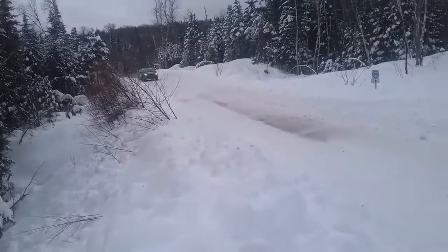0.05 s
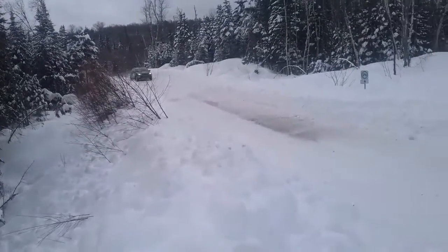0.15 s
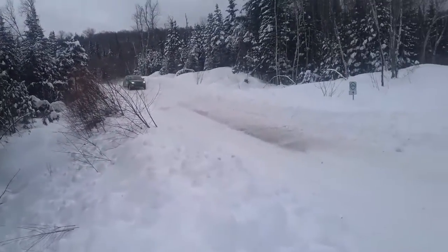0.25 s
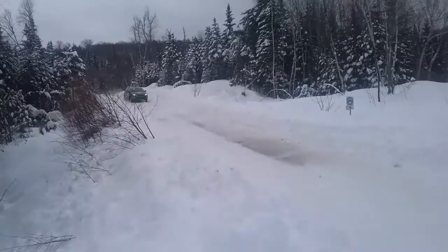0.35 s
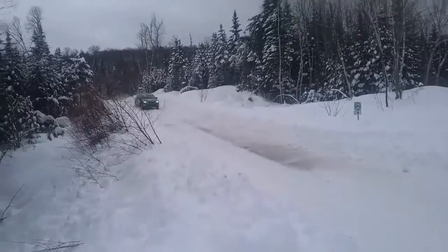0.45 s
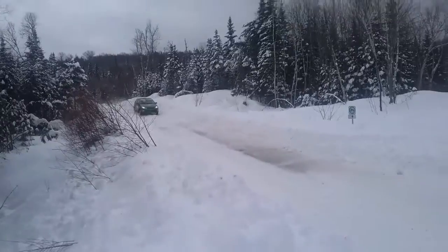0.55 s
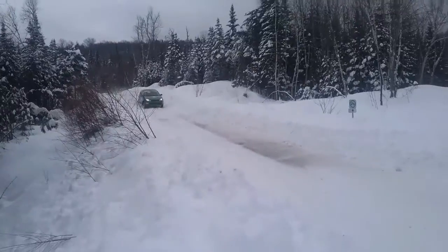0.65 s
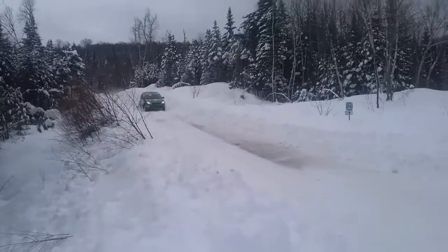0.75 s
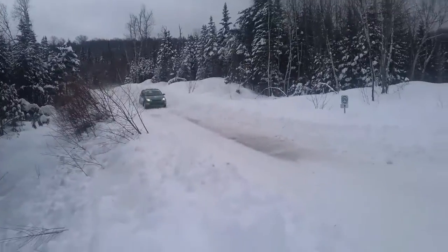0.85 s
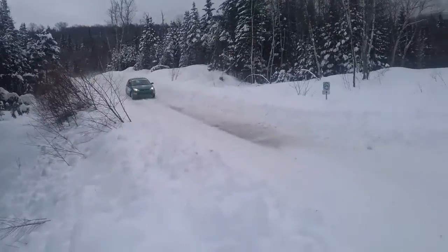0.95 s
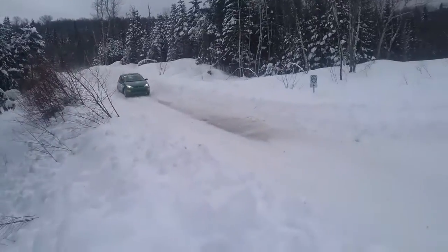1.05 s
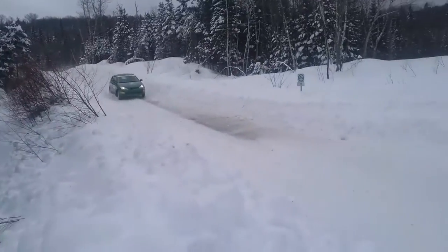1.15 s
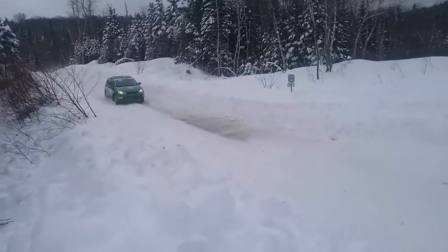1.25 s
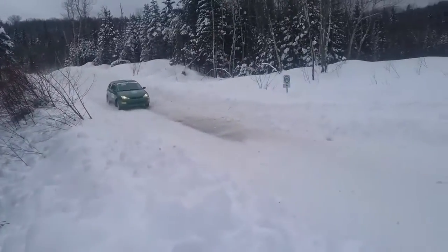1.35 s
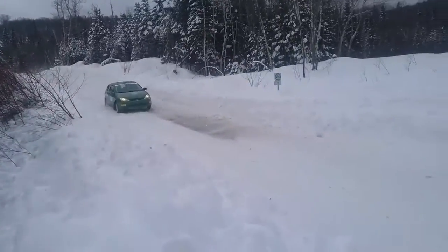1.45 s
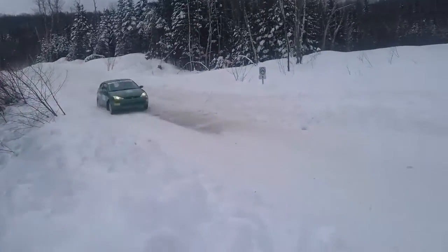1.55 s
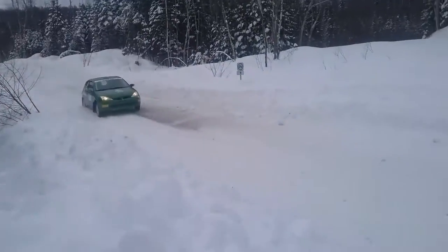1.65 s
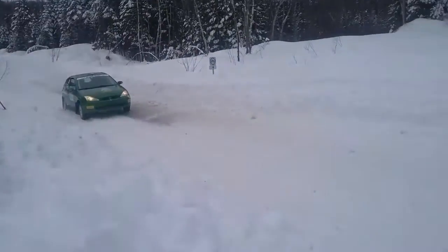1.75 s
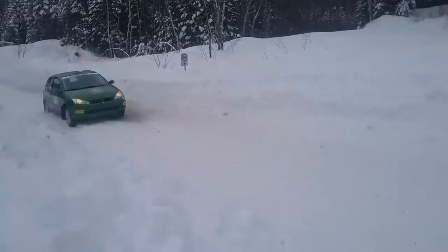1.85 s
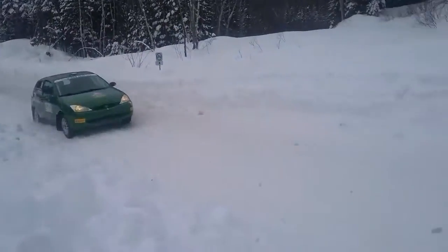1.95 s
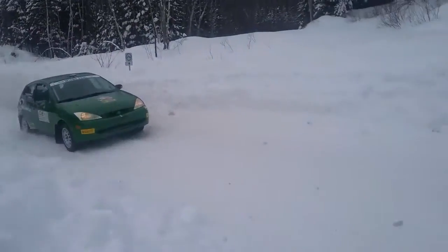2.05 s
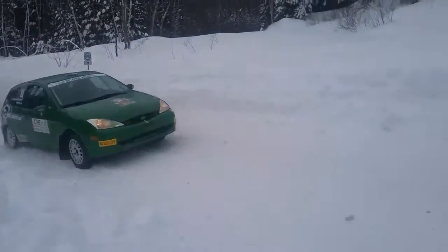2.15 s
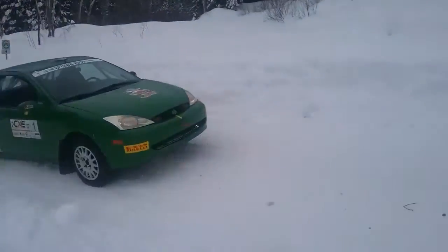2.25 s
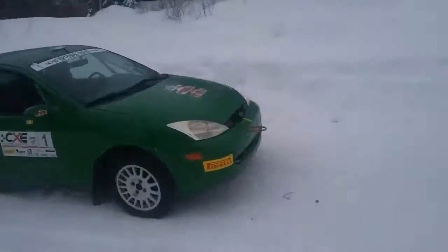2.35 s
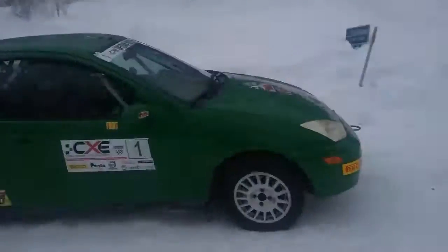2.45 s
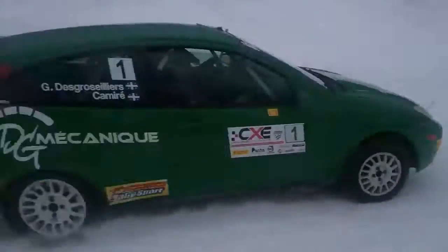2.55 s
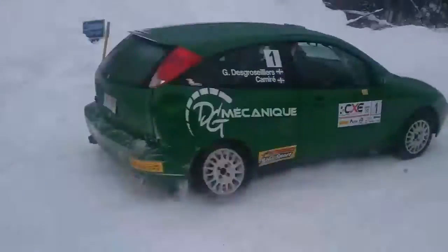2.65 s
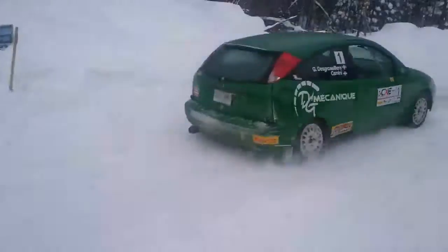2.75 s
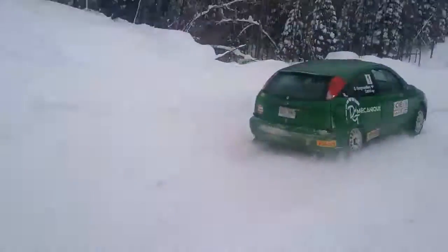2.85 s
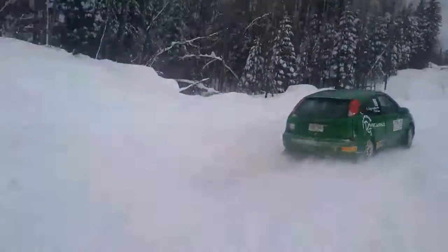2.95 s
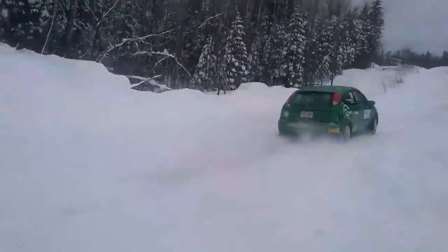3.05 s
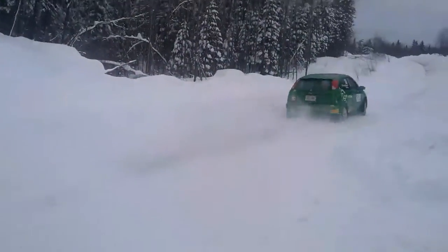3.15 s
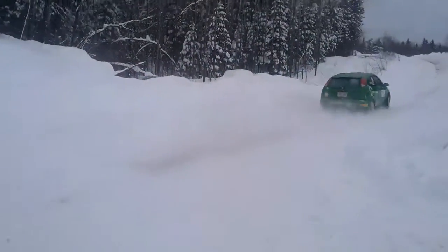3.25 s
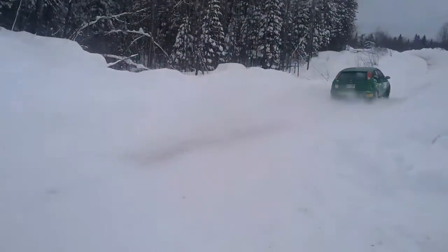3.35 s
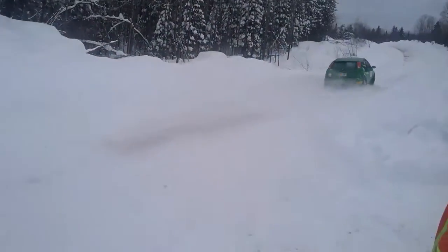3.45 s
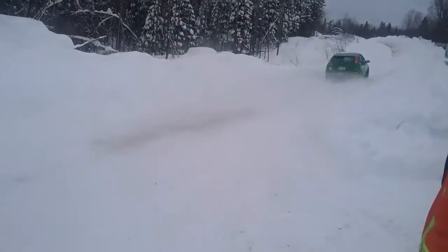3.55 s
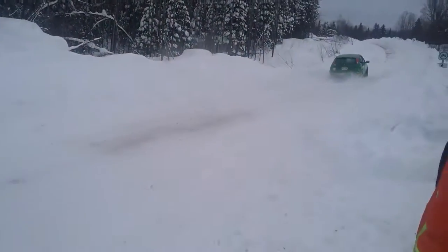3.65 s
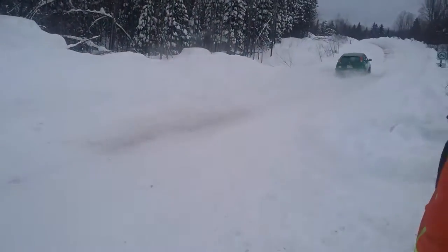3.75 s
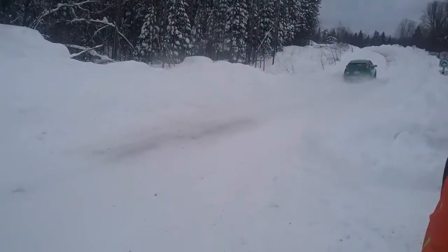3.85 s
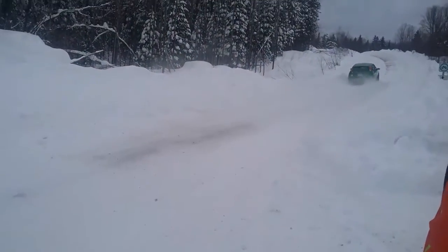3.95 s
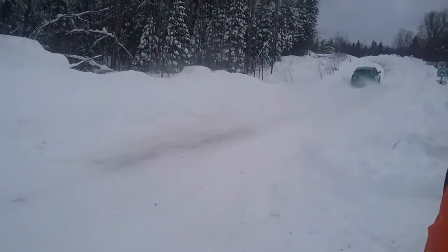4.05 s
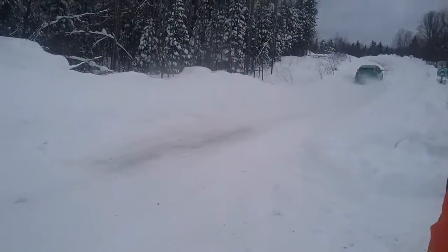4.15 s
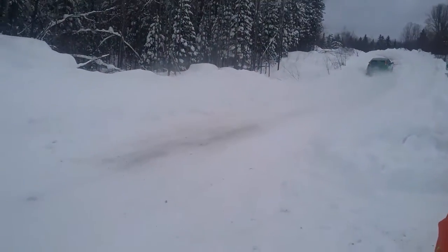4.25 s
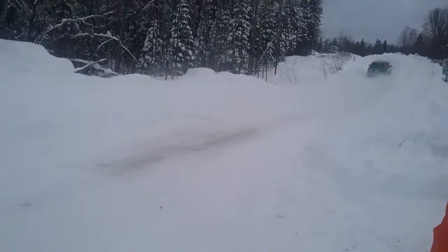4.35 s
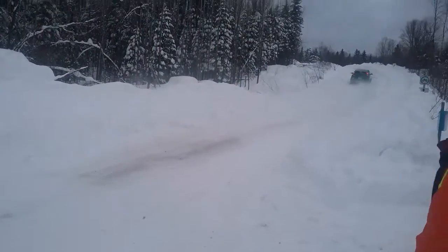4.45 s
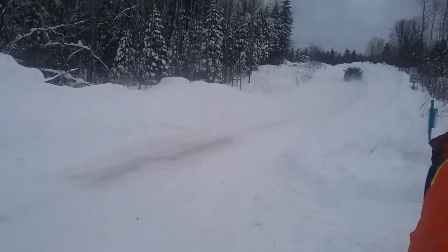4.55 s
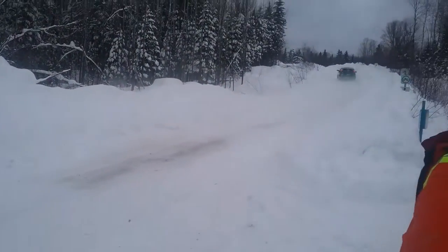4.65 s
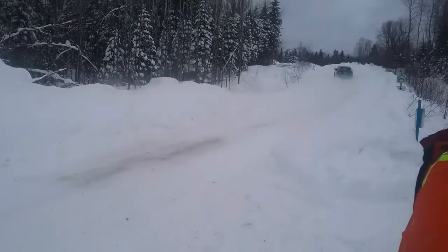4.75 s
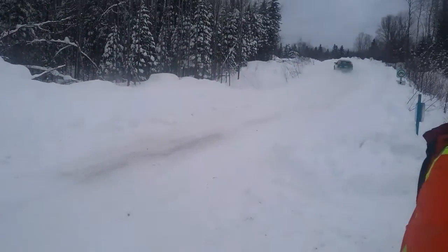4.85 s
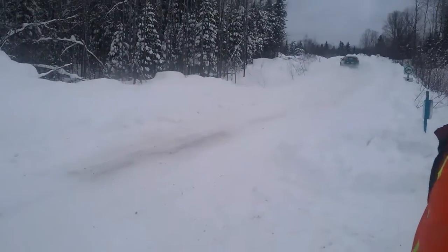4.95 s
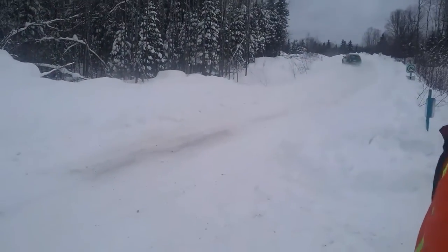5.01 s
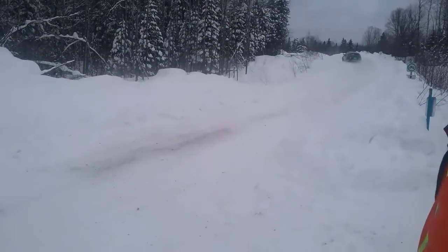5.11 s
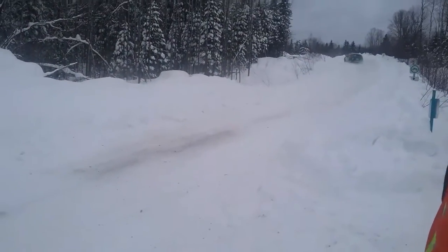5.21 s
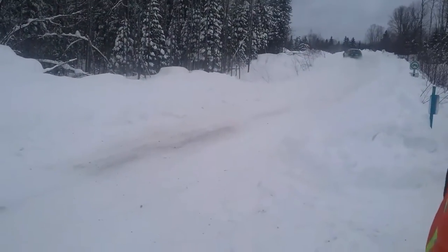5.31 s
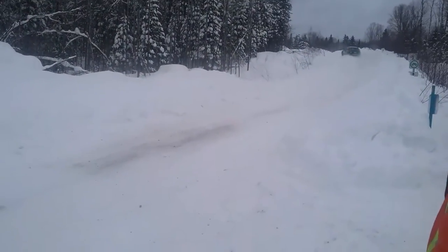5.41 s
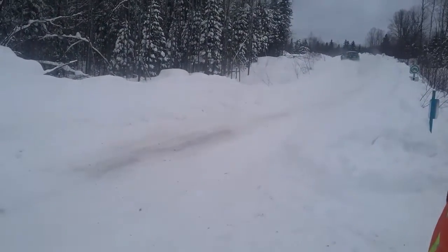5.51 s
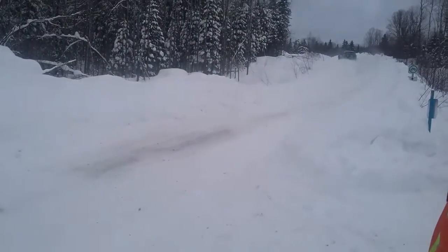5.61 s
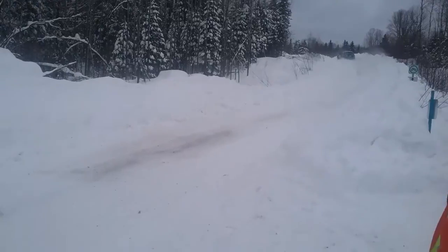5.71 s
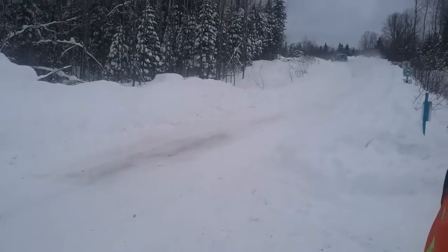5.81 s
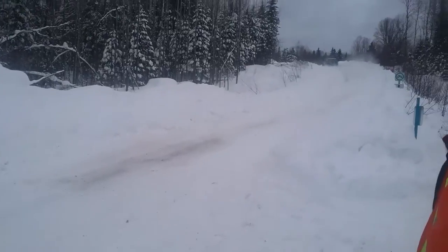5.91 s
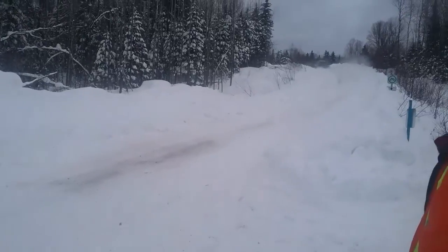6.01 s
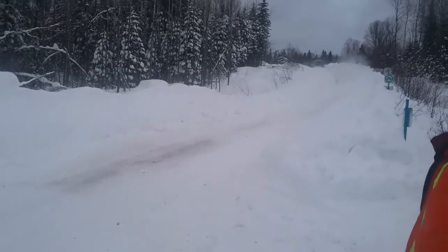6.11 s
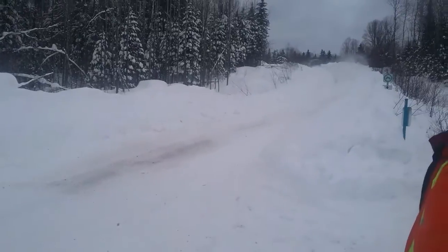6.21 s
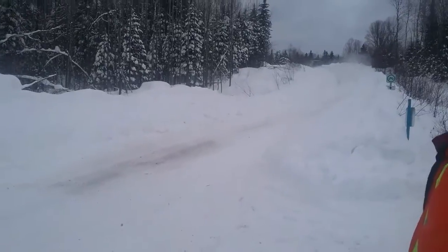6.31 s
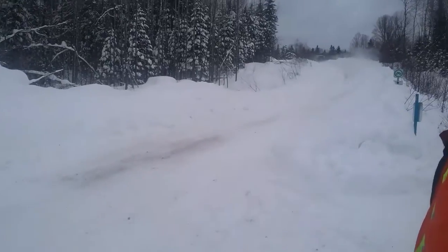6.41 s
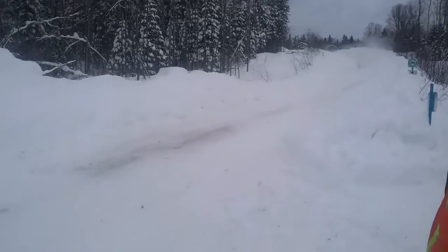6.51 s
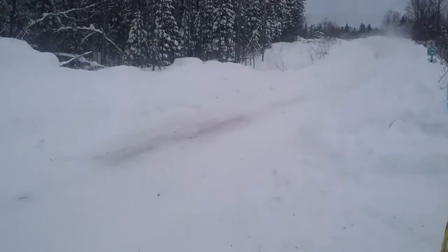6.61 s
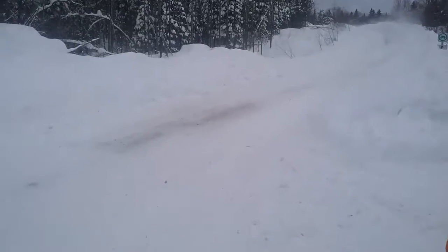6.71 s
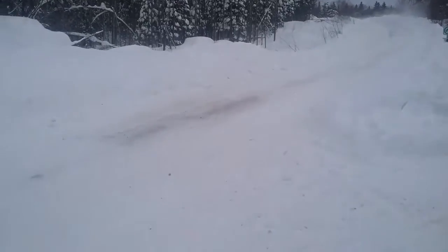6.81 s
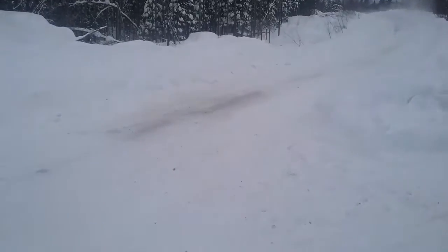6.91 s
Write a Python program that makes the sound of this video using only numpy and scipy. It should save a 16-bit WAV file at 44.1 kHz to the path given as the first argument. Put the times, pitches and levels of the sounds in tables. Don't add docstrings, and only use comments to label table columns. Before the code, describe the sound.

On a snowy forest road, a small four-cylinder car approaches with a hollow, rising engine drone and thin intake whistle. Tyres churn and lumps of snow spatter as it slides past a few metres away. The open tailpipe then barks and rasps loudly, crackling the pocket microphone, before the engine recedes, dips, opens once more and fades into soft hiss.

```python
import sys
import numpy as np
from scipy import signal
from scipy.fft import rfft, irfft, next_fast_len
from scipy.io import wavfile
from scipy.ndimage import uniform_filter1d, map_coordinates

SR = 44100
rng = np.random.default_rng(int(sys.argv[2]) if len(sys.argv) > 2 else 0)


def voltage_ratio(decibels):
    exponent = np.asarray(decibels, float) / 20
    return 10 ** exponent


def output_pcm(signal):
    pcm = np.clip(np.atleast_2d(signal).T, -1, 1) * 32767
    wavfile.write(sys.argv[1], SR, np.round(pcm).astype(np.int16))


N = 307377
TIME_S = np.arange(N) / SR
SLOW = np.arange(0, N + 64, 64)
SLOW_S = SLOW / SR


def rms_one(x):
    return x / np.sqrt(np.mean(x ** 2) + 1e-20)


def even(x):
    return x / np.sqrt(uniform_filter1d(x ** 2, size=4410) + 1e-12)


def in_time(rows, time_s=TIME_S):
    s, *columns = np.transpose(rows)
    return [np.interp(time_s, s, column) for column in columns]


def bump(s, half_s):
    return np.exp(-((SLOW_S - s) / max(half_s, .01)) ** 2)


def swells(rows):
    return sum(height * bump(s, half_s) for s, height, half_s in rows)


def full(slow):
    return np.interp(np.arange(N), SLOW, slow)


def drift(rate):
    r = np.exp(-80 * np.pi * rate / SR)
    slow = signal.lfilter([1], [1, -2 * r, r * r], rng.standard_normal(N // 40 + 2002))[2000:]
    return np.interp(np.arange(N) / 40, np.arange(len(slow)), rms_one(slow))


def at_hz(points, hz):
    points_hz, values = np.array(points)[:, 0], np.array(points)[:, 1]
    return np.interp(np.log(hz + 1), np.log(points_hz), values)


def band(x, low_hz, high_hz, order=2):
    return signal.sosfilt(signal.butter(order, [low_hz, high_hz], "band", fs=SR, output="sos"), x)


def colour(x, points):
    size = 2048
    cep = irfft(np.log(voltage_ratio(at_hz(points, np.fft.rfftfreq(size, 1 / SR)))))
    cep[1:size // 2] *= 2
    cep[size // 2 + 1:] = 0
    return signal.fftconvolve(x, irfft(np.exp(rfft(cep))))[:N]


def strikes(rows):
    out = np.zeros(N)
    for s, peak_db in rows:
        out[round(s * SR)] = voltage_ratio(peak_db)
    return out


# pitch_hz, level_db [dB per Hz]
AIR = [(530, -22), (900, -22.5), (2630, -11.5), (4880, -18), (6050, -9.5), (8860, -49), (15500, -31)]


def still_air():
    return voltage_ratio(-77) * rms_one(colour(rng.standard_normal(N), AIR))


# start_s, churn_db
ROAD = [(0, -40.5), (1.4, -32.5), (1.7, -27.5), (2.5, -21.5), (2.7, -28.5), (2.85, -22), (3.13, -32),
        (3.22, -43), (3.55, -41), (4.5, -53), (4.78, -61), (4.87, -56), (5.03, -41.5), (6.08, -49),
        (6.3, -51), (6.85, -66), (6.97, -55)]
# pitch_hz, level_db [dB per Hz]
CHURN = [(150, 5.5), (300, -5), (600, 3.5), (1000, -2), (1500, -4)]
# start_s, level_db, half_s
RUMBLE_SWELLS = [(.15, -10, .12), (.9, -7, .12), (1.55, 5.5, .1), (2.9, -4.5, .08), (3.25, -6, .08),
                 (3.8, -8, 0.27), (4.2, 6, .1), (4.65, 7, 0.21), (4.9, 6, .15), (5.3, -3, .2), (6.35, 3, .1),
                 (6.752, -5, .1)]


def road():
    churn_db, = in_time(ROAD)
    _, boom_db = in_time(LOAD)
    rumble_db = churn_db - 9.0 + 1.6 * np.minimum(boom_db, 0)
    rumble_level = (voltage_ratio(rumble_db) + voltage_ratio(-71)) * voltage_ratio(full(swells(RUMBLE_SWELLS)))
    rumble = rms_one(band(rng.standard_normal(N), 61, 109, order=3) * voltage_ratio(2.5 * drift(4)))
    churn = band(colour(rng.standard_normal(N), CHURN), 130, 1780)
    churn = rms_one(churn * voltage_ratio(0.8 * drift(12.0)))
    return rumble_level * rumble + voltage_ratio(churn_db) * churn


# start_s, peak_db
LUMPS = [(1.6656, -35), (2.1795, -35), (2.2428, -20.5), (2.2694, -33), (2.3444, -32), (2.388, -21.5),
         (2.4194, -25), (2.4806, -19.5), (2.4916, -33), (2.5242, -44), (2.5586, -26.5)]
# start_s, peak_db
THUDS = [(.435, -17.5), (1.6, -20), (2.0, -24), (2.81, -17), (3.0, -19), (3.1, -13.5), (4.1, -40),
         (5.03, -38), (6.27, -36)]
# start_s, peak_db
TICKS = [(.4352, -26), (6.762, -56), (6.789, -46), (6.795, -53)]


def knocks():
    t = np.arange(2000) / SR
    burst = np.convolve(strikes(LUMPS), t / 0.0057 * np.exp(1 - t / 0.01))[:N]
    burst = burst * rng.standard_normal(N)
    lumps = voltage_ratio(-5) * colour(burst, FIZZ) + voltage_ratio(0.5) * band(burst, 1240, 7100)
    push = np.sin(2 * np.pi * 70 * t) * np.exp(-t / 0.0046)
    knock = 2.1 * np.sin(2 * np.pi * 380 * t) * np.exp(-t / 0.00073)
    thuds = band(np.convolve(strikes(THUDS), push + knock)[:N], 50, 2000)
    return lumps + thuds + band(strikes(TICKS), 5500, 14830)


# start_s, note_db, boom_db
LOAD = [(0.0, -39.5, 8.5), (0.72, -31, 4.5), (1.28, -34.5, 10), (1.38, -27, 0), (1.57, -25, -4.5),
        (1.8, -29.5, 4), (1.96, -24, 8), (2.15, -21, 7), (2.55, -18.5, 6.5), (3.43, -17.5, -3.5),
        (3.96, -31, 0), (4.79, -35, -12), (4.861, -32, -4.5), (5.0, -25.5, -1.5), (5.24, -22.5, -6.5),
        (6.23, -27, -11), (6.72, -52, -1.5), (6.97, -43, -4)]
# start_s, level_db
JET_FORCE = [(0.0, -43), (0.19, -45), (1.14, -39.5), (2.48, -23), (2.57, -27), (2.76, -17.5), (3.1, -24),
             (3.8, -36), (4.27, -46), (4.55, -66), (4.801, -90), (4.851, -55.5), (4.931, -34), (5.55, -35),
             (6.27, -48), (6.68, -77.5), (6.88, -87.5), (6.97, -49)]
# start_s, level_db, half_s
COUGHS = [(1.462, 2, 0.013), (2.324, -1.5, .03), (2.856, 0.5, .03), (2.927, -1.5, 0.025), (3.12, 2.5, 0.06),
          (3.42, 0, 0.051), (3.512, 4, 0.053), (3.632, 1, 0.018), (3.728, 3.5, 0.069), (3.88, -2, 0.06),
          (4.228, 1, 0.034), (6.413, 7, 0.047)]
# start_s, pitch_hz, level_db,
# half_s
RANGE_CHANGES = [(1.63, 360, -10.5, 0.34), (1.698, 730, -19, 0.11), (2.41, 600, -18, 0.049),
                 (2.8, 740, -5.5, 0.05), (2.404, 175, 6.5, 0.15), (2.5, 175, -7.5, 0.034),
                 (2.585, 150, 1, 0.12), (2.566, 340, 11, 0.24), (5, 280, 6, .06), (2.73, 690, -6, 0.029),
                 (2.845, 320, -13, 0.044), (2.771, 165, -5.5, .07), (3.275, 452, -9.5, 0.33),
                 (3.45, 816, -10, 1), (4.199, 980, -20, 0.03), (4.4, 300, -9, 0.32), (4.724, 275, -26, 0.08),
                 (4.75, 880, -16, 0.053), (5.2, 1050, 8, 0.089), (3.5, 670, -12, 0.016),
                 (1.7, 520, -26, 0.016), (5.831, 770, -8, 0.033), (7.6, 870, 1, 0.3), (6.25, 415, -4, 0.15),
                 (6.504, 265, 7.5, 0.15), (6.623, 413, 14, 0.045), (7.7, 310, -7, 0.092),
                 (.15, 1267, -10, 0.2), (1.294, 1660, 2.5, 0.59), (2.294, 1030, 8.5, 0.11),
                (2.716, 2060, 5.5, 0.059), (2.798, 11000, -8, 0.11), (2.836, 6060, 4.5, 0.069),
                (2.941, 1830, -10.5, 0.12), (3.293, 1360, -12.5, 0.36), (3.9, 2140, -13, 0.055),
                (3.995, 1203, -21, 0.26), (4.347, 1252, -17.5, 0.096), (4.502, 1543, 13, 0.21),
                (4.502, 1950, 9, 0.14), (4.76, 1060, -13, 0.055), (4.877, 1448, 10, 0.038),
                (4.878, 1984, 9, 0.035), (4.845, 4470, -12, 0.028), (5.55, 2100, -5.5, 0.18),
                (5.641, 1049, 2, 0.26), (5.7, 1461, 5, 0.26), (6.002, 2080, 7, 0.36),
                (6.15, 1140, -15, 0.2), (6.2, 1414, 2, 0.45), (5.796, 1805, 4, 0.062),
                (6.95, 1810, -13, 0.048), (4.35, 11040, -9, .1), (4.953, 10810, -6, 0.061),
                (6.201, 11030, 0, .2), (6.399, 1053, 4, 0.094), (6.852, 1105, -11.5, 0.17),
                 (2.003, 1050, 5, 0.2), (2.2, 520, 2, .2), (2.57, 911, 11, 0.034), (2.61, 6040, -8.5, 0.063),
               (2.714, 680, -11, 0.024), (2.726, 2600, -9, .02), (2.79, 654, 0, .04),
               (2.812, 830, 10, 0.066), (2.82, 970, 3.5, 0.027), (2.83, 4540, -3, .04),
               (2.867, 2674, -26, 0.029), (2.91, 4000, 2, 0.032), (2.924, 329, 7, 0.029),
               (2.916, 6230, -3, 0.03), (3, 1001, 5, 0.049), (3.07, 2100, 0, 0.033),
               (3.113, 3620, -6, 0.03), (3.12, 4730, 1.5, .08), (3.2, 6640, -5, 0.1), (3.295, 3700, 0, .04),
               (3.354, 4300, 9, 0.015), (3.433, 5230, -9, 0.046), (3.471, 3500, -4, 0.027),
               (3.479, 4720, 9.5, .03), (3.63, 4300, -8, .03), (3.638, 1088, -9, .03),
               (3.725, 5000, -17, 0.015), (4.825, 2496, -8.5, 0.021), (4.881, 5600, 12.5, .015),
               (4.895, 3000, 14, 0.033), (4.96, 5770, -7.5, 0.054), (4.99, 1907, -23, 0.024),
               (5.056, 1460, 2.5, 0.065), (4.053, 1480, -1, .12), (4.303, 950, 6.5, 0.16),
               (4.851, 900, 7.5, .08), (4.93, 150, 3.5, 0.081), (1.45, 670, 3.5, 0.15), (2.6, 520, 1.5, .1),
               (4.9, 2300, -2, .04), (5.174, 953, -15, 0.066), (5.3, 1030, -3, 0.066),
               (5.58, 2744, 1, 0.05), (6.0, 4695, 6, .12), (6.255, 1451, -6, 0.079),
               (6.487, 5500, 7, 0.034), (6.753, 402, -7.5, 0.044), (6.936, 580, 11.5, .03),
               (6.97, 1480, -10, .03),
                 (4.72, 1500, 3.5, .08), (2.328, 560, -4, .1), (1.86, 520, -4, .1), (3.5, 330, -4, 0.13),
                (5.4, 1480, 0.5, .3), (4.6, 6300, 5, 0.017), (3.25, 1200, 3, .1), (5.65, 2600, -4, .08),
                (3.05, 660, 1.5, .12), (3.56, 700, 1.5, 0.099), (4.75, 2200, -6, .07), (4.25, 2700, 5, .03),
                (2.3, 1000, -2.5, 0.11), (5.3, 720, 2, .12), (6.7, 1500, -4, 0.11), (2.5, 510, 2, .06),
                (4.65, 620, -2.5, .1), (5.75, 910, -5, 0.22)]


def layer_db(law, hz):
    mean_db, note_share, boom_share, jet_share = law
    note_db, boom_db = in_time(LOAD, SLOW_S)
    jet_db, = in_time(JET_FORCE, SLOW_S)
    jet_db = jet_db + swells(COUGHS)
    changes_db = 0
    for s, centre_hz, db, half_s in RANGE_CHANGES:
        if abs(np.log2(np.mean(hz) / centre_hz)) < 1:
            octaves = np.log2(hz / centre_hz)
            changes_db = changes_db + db * bump(s, half_s) * np.exp(-(octaves / 0.26) ** 2)
    controls_db = note_share * (note_db + 30) + boom_share * boom_db + jet_share * (jet_db + 38)
    return full(mean_db + controls_db + changes_db)


# start_s, pitch_hz
RATE = [(0, 139.5), (.85, 153.7), (1.25, 159.2), (1.5, 165.9), (1.8, 170.9), (2.45, 173.8), (2.699, 173),
        (2.77, 160.3), (2.922, 159.5), (3.1, 171.7), (3.25, 165.1), (3.75, 158.6), (4.2, 156.6),
        (4.75, 136.9), (5.27, 149), (5.649, 149.1), (5.901, 142.4), (6.97, 126.6)]
# start_s, change_hz, half_s
SLIPS = [(0.121, 2, 0.049), (0.251, -1.5, 0.069), (0.426, 1.5, 0.043), (1.022, -4, 0.053), (1.38, 8, 0.045),
         (1.463, -6.5, 0.038), (1.973, -4.5, 0.056), (2.552, -6, 0.052), (3.186, -1.5, 0.024),
         (3.431, 2.5, 0.03), (3.642, 2.5, 0.045), (3.729, -2.5, 0.064), (4.021, 2.5, 0.0703),
         (4.283, -5, 0.049), (5.003, 1.5, .1), (5.489, -4.5, 0.073), (5.599, 1.5, .04), (6.235, 2, 0.055),
         (6.644, -1, 0.17)]
# mean_db, note_share, boom_share, jet_share [dB per dB]
NOTE_LAW = [(-32.5, 1.004, 1.29, 0.015), (-35, 0.41, -0.24, 0.22), (-36.5, 1.27, 0.21, 0.00097),
            (-32.5, 1.194, 0.033, 0.034), (-36.5, 0.81, 0.064, 0.16), (-46.5, 0.83, 0.37, 0.063)]


def firings():
    hz, = in_time(RATE, SLOW_S)
    hz = hz + swells(SLIPS)
    levels_db = [layer_db(law, (k + 1) * hz) for k, law in enumerate(NOTE_LAW)]
    turns = np.cumsum(full(hz) * (1 + 0.0029 * drift(13.9))) / SR
    first_flip = round((FLIPS[0][0] - .0004) * SR)
    return levels_db, turns + 1 - turns[first_flip] % 1


# start_s, multiple, level_db, half_s
INTAKE_SONG = [
    (1.1, 9.0, -41, .28),
    (1.68, 10.0, -38, .17),
    (1.97, 10.0, -36, .12),
]


def intake(turns):
    out = 0
    for s, multiple, db, half_s in INTAKE_SONG:
        level = voltage_ratio(db + 3 * drift(12)) * full(bump(s, half_s))
        out = out + level * np.sin(2 * np.pi * multiple * turns)
    return out


LAG = [.1, 1.2, 0, .8, .8, .8]
# start_s, turn [radians]
TURN = [(0, -.5), (1.5, -.5), (2.2, 1.6), (2.56, 1.1), (2.7, .8), (2.8, 0), (6.97, 0)]
CYLINDERS = [0.61, 0.49, -0.28, -1.26]
PASS_S, PASS_HALF_S = 2.6, 0.44


def note(turns, levels_db):
    turn, = in_time(TURN)
    tones = 0
    for k, db in enumerate(levels_db):
        wander = .09 * k * drift(22)
        phase = 2 * np.pi * (k + 1) * turns - LAG[k] - turn + wander
        tones = tones + voltage_ratio(db + 1.33 * drift(28)) * np.cos(phase)
    unequal_db = np.interp(turns % 4, np.arange(5), CYLINDERS + CYLINDERS[:1])
    uneven = 1 + 1.4 * full(bump(PASS_S, PASS_HALF_S))
    return -np.sqrt(2) * tones * voltage_ratio(unequal_db * uneven)


# start_s, extra snow path_ms, snow_strength [0-1], bank_strength [0-1]
SNOW_ECHO = [(0, 0.4, 0, 0.96), (2.0, 0.7, 0.13, 0.3), (2.6, 0.79, 0.02, 0.07), (3.0, 0.37, 0.2, 0.01),
             (3.4, 0.43, 1, 0.3), (4.4, 0.46, 0.46, 0.5), (4.8, 0.39, 0, 0.1), (4.95, 0.432, 0.16, 0.1),
             (5.04, 0.46, 0.46, 0.99), (6.1, 0.54, 0.23, 0.36), (6.97, 0.5, 0.1, 0.46)]
BANKS_MS = [1.1, 1.9, 3.1, 4.3]


def snow_echo(x, share):
    path_ms, strength, banks = in_time(SNOW_ECHO)
    delay = path_ms * (1 + 0.11 * drift(8.9)) * SR / 1000
    late = map_coordinates(x, [np.arange(N) - delay], order=1)
    late = signal.sosfilt(signal.butter(1, 3200, fs=SR, output="sos"), late)
    sides = sum(drift(1.98) * np.roll(x, round(ms * SR / 1000)) for ms in BANKS_MS)
    return x + share * (np.clip(strength, 0, 1) * late + np.clip(banks, 0, .3) * sides)


TIP_HEARD_S, TIP_HALF_S = 2.86, 0.21


def pipe_tip(pulses):
    ring_hz, t60_s = 4050, .005
    r, w = voltage_ratio(-60 / (t60_s * SR)), 2 * np.pi * ring_hz / SR
    ring = signal.lfilter([0, np.sin(w)], [1, -2 * r * np.cos(w), r * r], pulses + 1e-18)
    return voltage_ratio(-24) * full(bump(TIP_HEARD_S, TIP_HALF_S)) * ring


# pitch_hz, level_db [dB per Hz]
BARK = [(800, -6), (1030, 0.5), (1230, -5), (1450, -1), (1750, -1.5), (2050, 1.5), (2400, -6.5),
        (2750, -5.5), (3500, -12.5), (5400, -2), (6300, 8), (6850, 2), (7600, -28), (10000, -45.5)]


def bark(turns):
    count = np.arange(int(turns[0]) + 1, int(turns[-1]))
    at = np.interp(count, turns, np.arange(N))
    jitter = 1 + bump(TIP_HEARD_S, TIP_HALF_S)[(at / 64).astype(int)]
    at = at + jitter * rng.standard_normal(len(count))
    size = voltage_ratio(0.4 * rng.standard_normal(len(count)))
    whole = at.astype(int)
    pulses = np.zeros(N + 1)
    pulses[whole] = size * (1 - at % 1)
    pulses[whole + 1] = size * (at % 1)
    pulses = pulses[:N]
    return snow_echo(colour(pulses + pipe_tip(pulses), BARK), share=1.6)


def gas_puff(turns):
    phase, cycle = turns % 1, turns.astype(int)
    strength = voltage_ratio(1.6 * rng.standard_normal(cycle[-1] + 1))[cycle]
    return rms_one((1 - np.exp(-phase / .06)) * np.exp(-phase / .2) * strength)


# pitch_hz, level_db [dB per Hz]
RASP = [(700, -14.5), (900, -9.5), (1500, -7.5), (3300, -3.5), (5400, -12.5), (6300, -10.5), (6900, -20),
        (7600, -31), (10000, -45)]


def rasp(puff, locked):
    gate = locked ** 2 * puff + (1 - locked ** 2) * 1.3
    return snow_echo(colour(rng.standard_normal(N) * gate, RASP), share=0.5)


# pitch_hz, level_db [dB per Hz]
FIZZ = [(6000, -29.5), (7300, 4.5), (8500, -7.5), (10500, -8), (12000, -4.5), (14500, -4), (15900, -2),
        (16500, -11)]
# start_s, level_db
HISS = [(0, -92), (6.2, -92), (6.5, -79), (6.97, -79)]
# start_s, level_db, half_s
SPRAY = [
    (2.8, -37, .08),
    (3.302, -55, .35),
    (3.899, -68, .25),
]


def fizz_and_spray(puff, locked, fizz_db):
    gate = locked ** 4 * puff ** 1.3 + (1 - locked)
    fizz = even(colour(rng.standard_normal(N) * gate, FIZZ))
    spray_level = full(swells([(s, voltage_ratio(db), half_s) for s, db, half_s in SPRAY]))
    spray = spray_level * even(band(fizz, 12900, 15800))
    hiss_db, = in_time(HISS)
    return (voltage_ratio(fizz_db + 3.5) + voltage_ratio(hiss_db)) * fizz + spray


RANGES_HZ = [1030, 1240, 1460, 1750, 2080, 2750, 3600, 4500, 5600, 6500]
# pitch_hz, delay_ms
PIPE_DELAY = [(3300, 0), (3900, 1.9), (4600, 1.1), (5600, .45), (6800, 0)]


def ranges(x):
    size = next_fast_len(N)
    hz = np.fft.rfftfreq(size, 1 / SR)
    lag_turns = np.cumsum(at_hz(PIPE_DELAY, hz)) * hz[1] / 1000
    spectrum = rfft(x, size) * np.exp(-2j * np.pi * lag_turns)
    log_hz = np.log(hz + 1)
    corners = np.log([800] + RANGES_HZ)
    slices = []
    for one in np.eye(len(RANGES_HZ) + 1)[1:]:
        part = irfft(spectrum * np.interp(log_hz, corners, one), size)[:, :N]
        slices.append(even(part))
    return slices


# start_s, locked [share tied to the firings 0-1], facing_db [tailpipe to listener]
LOCKED = [(0, .28, 3), (2.0, .3, 4), (2.5, .35, 0), (2.6, .8, 0), (2.68, .9, 1), (3.2, .9, .5),
          (3.8, .92, .5), (3.95, .9, -1.5), (4.3, .92, -1), (4.45, .95, 1), (4.95, .95, 1), (5.02, .74, -2),
          (5.6, .73, -1.8), (5.8, .78, 0), (6.97, .55, 1)]
# mean_db, note_share, boom_share, jet_share [dB per dB]
PIPE_LAW = [(-40.5, 0.41, -0.03, 0.3), (-43.5, 0.12, 0.49, 0.6), (-42, 0.61, -0.036, 0.5),
            (-44.5, 0.42, 0.17, 0.56), (-41, 0.15, -0.21, 0.73), (-43, 0.21, -0.11, 0.78),
            (-45, -0.3, -0.018, 1.2), (-46, -0.044, .02, 1.09), (-44, -0.33, -0.19, 1.306),
            (-43.5, -0.24, -0.13, 1.26), (-63, 0.069, .15, 1.18)]


def tailpipe(turns):
    *range_db, fizz_db = [layer_db(law, hz) for law, hz in zip(PIPE_LAW, RANGES_HZ + [11000])]
    locked, facing_db = in_time(LOCKED)
    turns = turns + .09
    puff = gas_puff(turns)
    slices = ranges(np.array([bark(turns), rasp(puff, locked)]))
    direct = np.clip(locked * voltage_ratio(np.clip(facing_db, -4, 5)), 0, .95)
    clean = [1, 1, 1, 1, 1, .98, .95, .93, .86, .8]
    out = 0
    for db, (pulse, gas), clear in zip(range_db, slices, clean):
        share = np.clip(clear * direct, 0, .97)
        out = out + voltage_ratio(db - 2.0) * (np.sqrt(share) * pulse + np.sqrt(1 - share) * gas)
    return out + fizz_and_spray(puff, locked, fizz_db)


def scene():
    levels_db, turns = firings()
    background = still_air() + road() + knocks()
    mono = background + intake(turns) + note(turns, levels_db) + tailpipe(turns)
    return np.array([mono, mono])


# start_s, height_db
FLIPS = [(2.9155, 8.5), (2.9405, 9.5), (2.9465, 6.5), (2.9953, 0), (3.0077, 11.5), (3.014, 9.5),
         (3.0605, 0.5)]


def input_flips(x):
    at = np.round(np.array(FLIPS)[:, 0] * SR).astype(int)
    at += np.argmin(x[at[0] - 160:at[0] + 110]) - 160
    dips = [i - 50 + np.argmin(x[i - 50:i + 50]) for i in at]
    thin = strikes([(i / SR, db) for i, (s, db) in zip(dips, FLIPS)])
    return voltage_ratio(3) * (thin - 0.74 * uniform_filter1d(thin, size=7))


def band_limit(x):
    return signal.sosfilt(signal.butter(12, 16930, fs=SR, output="sos"), x)


def record(dry):
    x = 1.1 * np.tanh(dry / 1.1)
    x = signal.sosfilt(signal.cheby2(20, 50, 16010, fs=SR, output="sos"), x)
    x = signal.sosfilt(signal.butter(2, 42, "high", fs=SR, output="sos"), x)
    x = np.clip(x + input_flips(x[0]), -.85, 1.45)
    x = signal.sosfiltfilt(signal.cheby2(12, 45, 16950, fs=SR, output="sos"), x)
    return band_limit(np.clip(x, -1, 1))


dry = scene()
out = record(dry)
output_pcm(out)
```